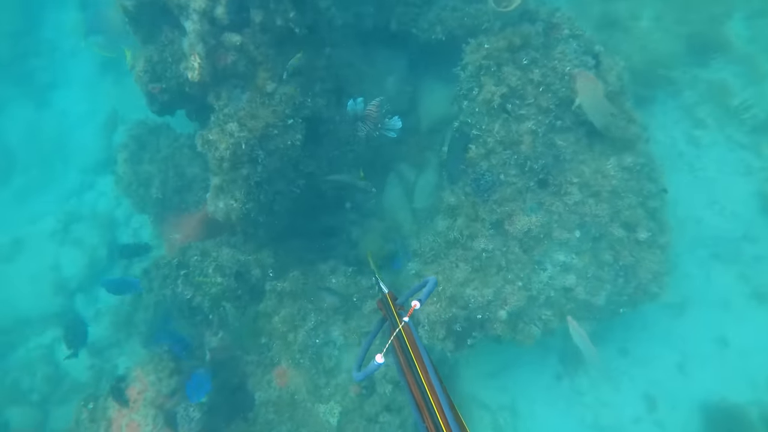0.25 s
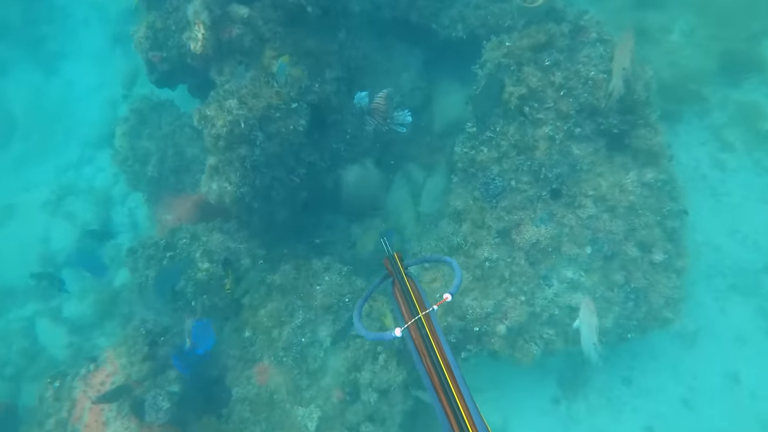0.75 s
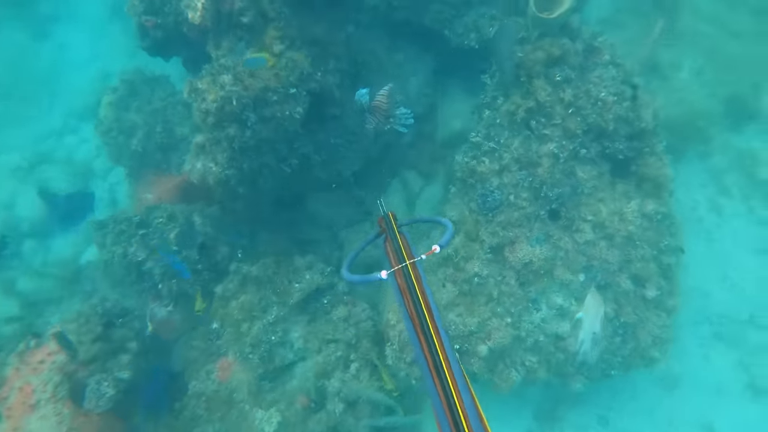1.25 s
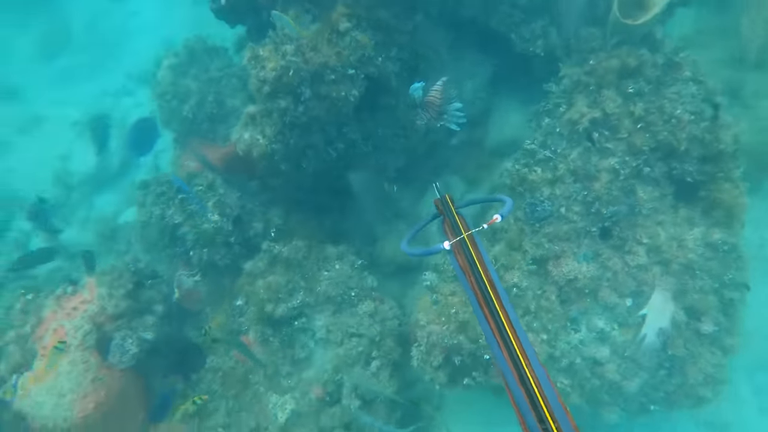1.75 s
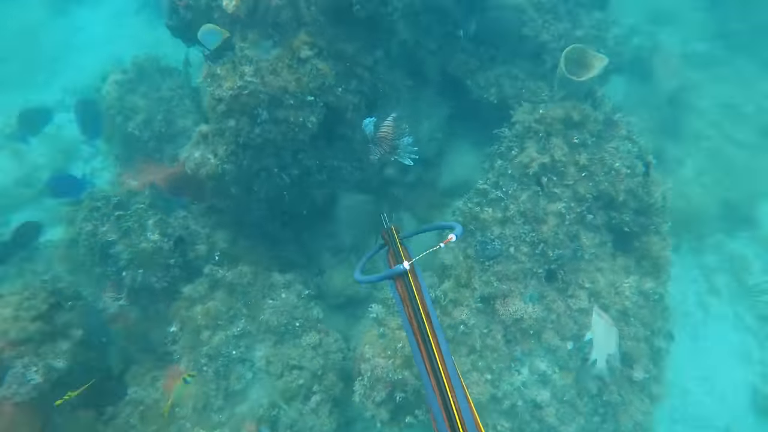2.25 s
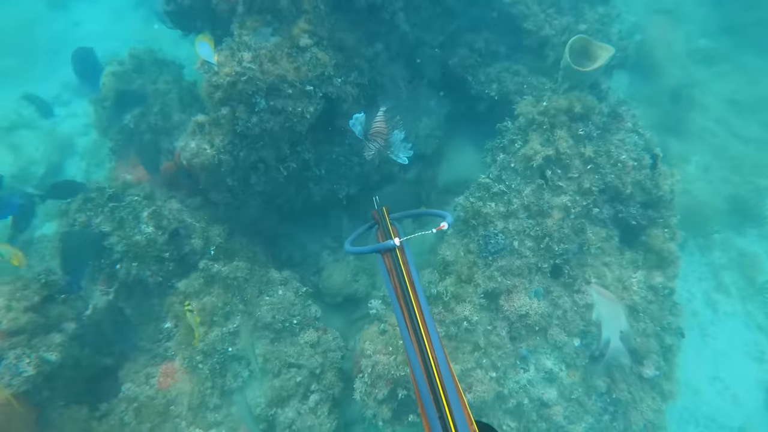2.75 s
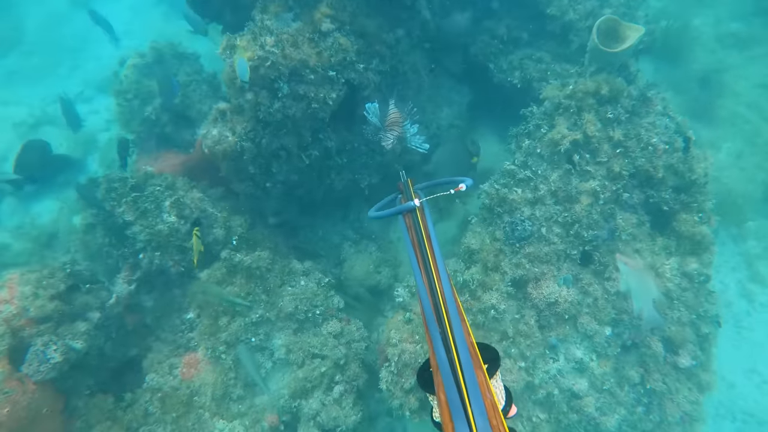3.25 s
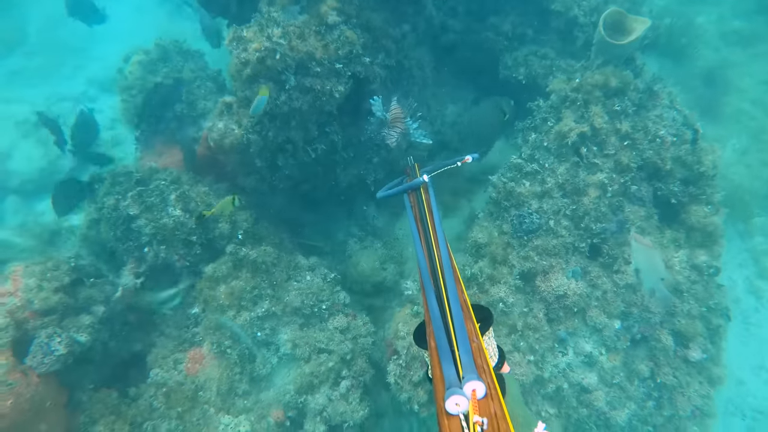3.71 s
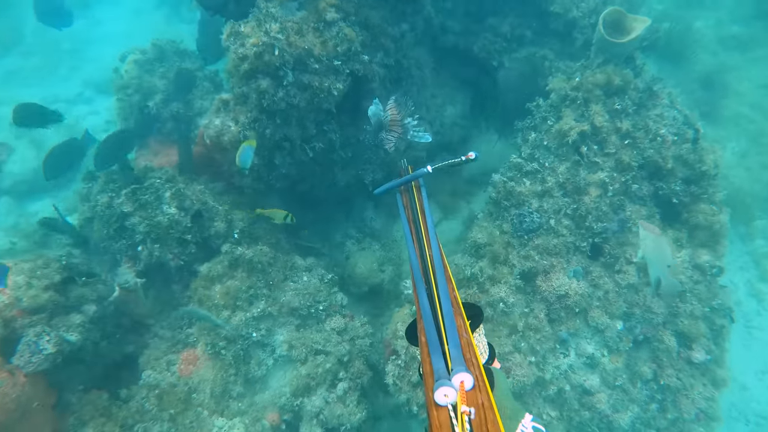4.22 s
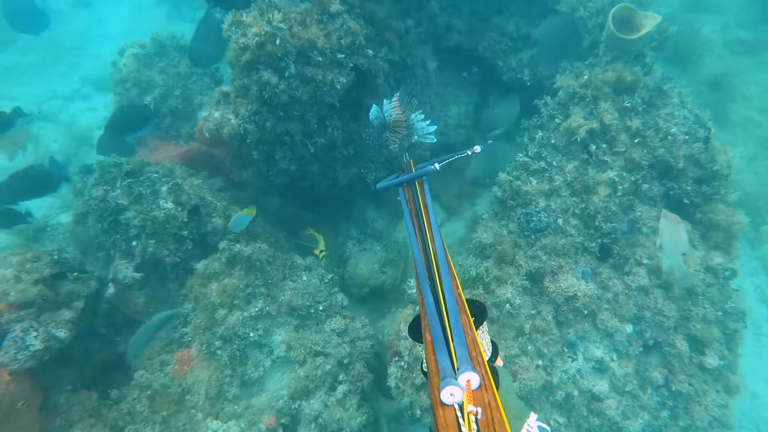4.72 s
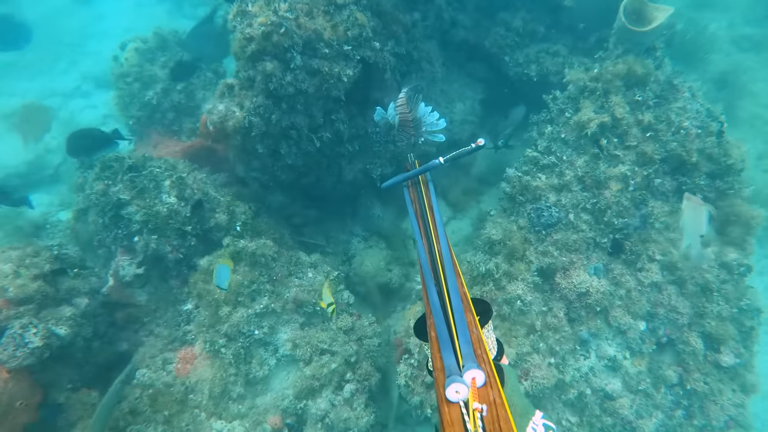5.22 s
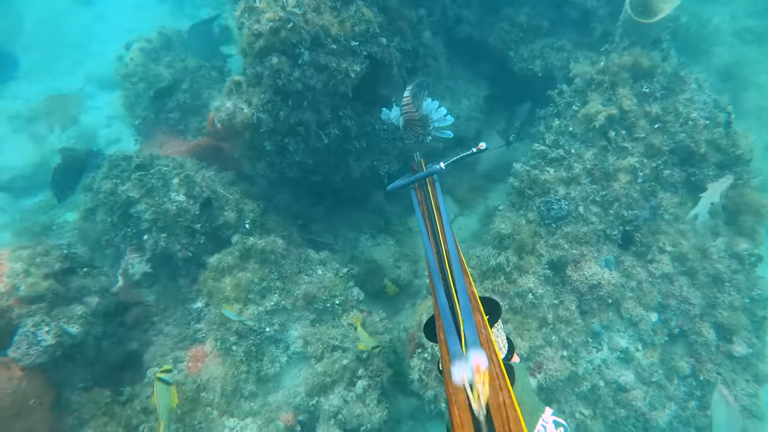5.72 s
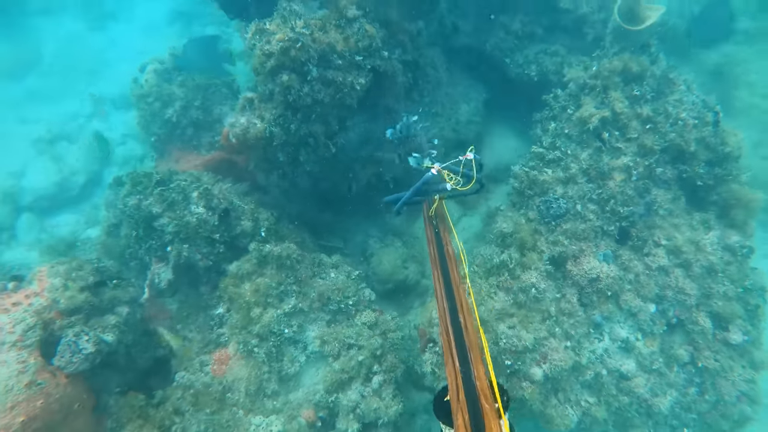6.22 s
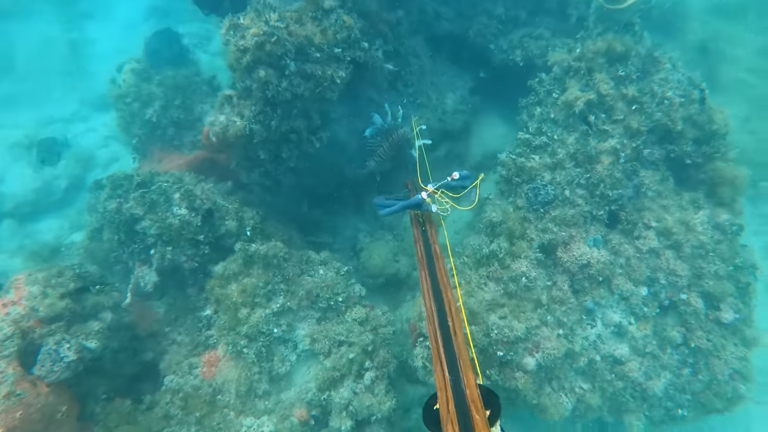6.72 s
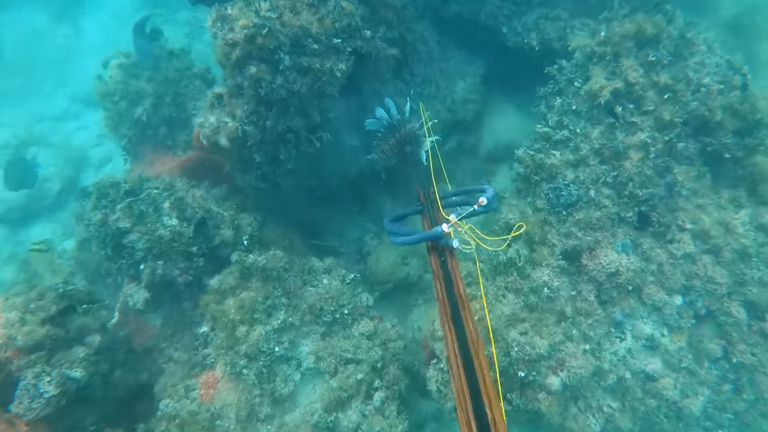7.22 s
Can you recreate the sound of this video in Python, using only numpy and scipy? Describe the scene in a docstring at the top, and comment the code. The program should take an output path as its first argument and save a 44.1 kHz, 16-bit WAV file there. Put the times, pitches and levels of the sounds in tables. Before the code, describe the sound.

Muffled underwater hum of a far boat, sharp shrimp snaps, then a heavy speargun shot with clattering line and a few closing bubbles.

```python
"""Under water on a reef, heard through a sealed camera housing. From the start a far boat motor hums, water
rumbles (filtered noise) and shrimp crackle and snap (noise bursts ringing the resonances of the housing).
A few thuds and faint bubbles (dying sines) pass; at 5.9 s a speargun is fired, water churns (swelling noise)
and its bands and line knock and rattle (more sines and bursts). Last, louder bubbles escape.
Gain control ducks on loud sound throughout."""
import sys
import numpy as np
from scipy import signal
from scipy.fft import rfft, irfft
from scipy.io import wavfile
from scipy.ndimage import uniform_filter1d

SR = 44100
rng = np.random.default_rng(int(sys.argv[2]) if len(sys.argv) > 2 else 0)


def master_out(mix):
    """Clip the mix to full scale and print it as 16-bit PCM to the path in sys.argv[1]."""
    frames = np.transpose(np.atleast_2d(mix))
    ceiling = np.clip(frames, -1, 1)
    pcm = np.round(ceiling * 32767).astype(np.int16)
    wavfile.write(sys.argv[1], SR, pcm)


N = 329427


def amp(db):
    """Decibels to gain."""
    return 10 ** (np.asarray(db) / 20)


def rms_one(x):
    """Scale to unit rms."""
    return x / np.sqrt(np.mean(x ** 2) + 1e-20)


def in_time(rows):
    """Columns of a curve table, interpolated to one value a sample."""
    time_s, *columns = np.transpose(rows)
    return [np.interp(np.arange(N) / SR, time_s, column) for column in columns]


def drift(rate_hz):
    """Slow random curve of spread 1: noise through two equal low-pass poles, run at SR / 40."""
    r = np.exp(-80 * np.pi * rate_hz / SR)
    noise = rng.standard_normal(N // 40 + 2002)
    slow = signal.lfilter([1], [1, -2 * r, r * r], noise)[2000:]   # drop the settling
    return np.interp(np.arange(N) / 40, np.arange(len(slow)), rms_one(slow))


def ring(x, hz, width_hz):
    """Two-pole resonance: a unit click starts a dying sine of nominal height 1."""
    r, w = np.exp(-np.pi * width_hz / SR), 2 * np.pi * hz / SR
    return signal.lfilter([0, np.sin(w)], [1, -2 * r * np.cos(w), r * r], x + 1e-18)


def steady(x, hz, width_hz):
    """Resonance applied twice for steep skirts, about gain 1 on its top."""
    wide_hz = 1.4 * width_hz
    top_gain = 4 * (1 - np.exp(-np.pi * wide_hz / SR)) ** 2
    return ring(ring(x, hz, wide_hz), hz, wide_hz) * top_gain


# housing resonances: (frequency [Hz], nominal width [Hz], level [dB])
HOUSING_MODES = [(354, 54.3, -1), (426, 55.6, 1), (474.8, 56, -7), (626.5, 100, -19), (756, 315, -34.5),
                 (1364.2, 105, -11), (1563.7, 88, -4), (1739, 89, -9), (1982, 210, -22.5), (2493, 344, -24),
                 (3004, 600, -26), (3516, 150, -29.5), (3843, 250, -20), (4488, 425, -24),
                 (4950, 267, -21.5), (5540, 107, -26), (6550, 720, -24), (7923, 680, -29), (8877, 385, -29),
                 (9370, 980, -38.5), (10290, 950, -40.5), (11700, 1700, -49), (13400, 1800, -50)]
# low, body, middle and top parts of the housing: (from [Hz], to [Hz])
HOUSING_PARTS = [(0, 1000), (1000, 2300), (2300, 5500), (5500, 20000)]


def housing(x, part, spread_db=None, damping=1):
    """Parallel modes of one part of the housing; a deep gap parts the low modes from the body modes."""
    low_hz, high_hz = HOUSING_PARTS[part]
    out, sign, reach_hz = 0, 1, 0
    for k, (hz, nominal_width_hz, mode_db) in enumerate(HOUSING_MODES):
        if low_hz < hz < high_hz:
            width_hz = nominal_width_hz * damping
            if hz - width_hz < reach_hz:   # overlapping neighbours swing against each other
                sign = -sign
            reach_hz = hz + width_hz
            gain_db = mode_db if spread_db is None else mode_db + spread_db(k)
            out = out + sign * amp(gain_db) * steady(x, hz, width_hz)
    if part:
        gap = signal.butter(3, 1100.0, "high", fs=SR, output="sos")
    else:
        gap = signal.butter(3, [290.0, 700.0 * damping ** .5], "band", fs=SR, output="sos")
    return signal.sosfilt(gap, out)


# motor, swelling as the boat rides the waves: (time [s], mean hum frequency [Hz], hum level before flutter [dB])
MOTOR_CURVE = [(0.0, 88.5, -38), (0.2, 92, -33), (0.55, 89.35, -41), (0.92, 87.8, -41), (1.25, 89.85, -39),
               (1.55, 92.7, -35.5), (1.85, 92.6, -38), (2.07, 88.6, -46), (2.45, 93, -32), (2.7, 89, -41.5),
               (3.1, 89, -40.5), (3.3, 90, -39), (3.56, 94, -35.5), (3.85, 90, -40.5), (4.0, 88.9, -42.5),
               (4.45, 90.5, -40), (4.7, 93, -36), (5.15, 89, -42), (5.33, 89.4, -46.5), (5.7, 91.8, -38.5),
               (6.6, 93.7, -42.5), (7.47, 84.4, -56.5)]
# thin whine from the motor's gearing: (time [s], level [dB])
WHINE_CURVE = [(0, -65), (1.5, -73.5), (2.6, -51), (4.0, -47), (4.6, -52), (7.47, -51.5)]
WHINE_HZ, WHINE_WIDTH_HZ = 1586, 40
WAVER_HZ, FLUTTER_DB, FLUTTER_RATE_HZ = 1.2, 2, 7.5
SCATTER_SHARE, SCATTER_RATE_HZ = .4, 6   # paths shifting off surface and bed


def motor():
    """One firing order wavers and is broken up by scattered paths; the whine is noise in a narrow resonance."""
    mean_hz, hum_db = in_time(MOTOR_CURVE)
    scatter = drift(SCATTER_RATE_HZ) + 1j * drift(SCATTER_RATE_HZ)
    paths = 1 + SCATTER_SHARE * scatter
    turns = np.cumsum(mean_hz + WAVER_HZ * drift(3.47)) / SR
    hum = rms_one(np.imag(paths * np.exp(2j * np.pi * turns)))
    whine = rms_one(steady(rng.standard_normal(N), WHINE_HZ, WHINE_WIDTH_HZ))
    hum_gain = amp(hum_db + FLUTTER_DB * drift(FLUTTER_RATE_HZ))
    return hum_gain * hum + amp(in_time(WHINE_CURVE)[0]) * whine


# rumble spectrum before the cut below 16 Hz: (frequency [Hz], relative level [dB per Hz])
RUMBLE_SPECTRUM = [(20, 3), (30, -2), (50, -6.5), (70, -8), (110, -12.5), (140, -13.5), (180, -26),
                   (215, -23), (265, -29.5), (500, -56.5), (900, -60.5), (2000, -99)]


def rumble(level_db):
    """Water shoving at the housing: lumpy low noise, shaped in the spectrum."""
    hz = np.maximum(np.arange(N // 2 + 1) * SR / N, 1)
    corner_hz, density_db = np.array(RUMBLE_SPECTRUM).T
    shape = amp(np.interp(np.log(hz), np.log(corner_hz), density_db))
    shape = shape * np.minimum(hz / 16, 1) ** 2
    noise = rms_one(irfft(rfft(rng.standard_normal(N)) * shape, N))
    return amp(level_db + 2.5 * drift(7.2)) * noise


BASE_CRACKLE_PER_S = 220   # before clumping
CRACKLE_DB, HISS_DB = -26.5, -27   # before the housing
FAR_CUT_HZ = 12100   # far sound loses its top


def crackle():
    """Far snaps at random, in clumps, each smeared by the coral into a dying burst of noise."""
    sizes = amp(6.6 * np.minimum(rng.exponential(1, N), 3.5))
    born = rng.random(N) < BASE_CRACKLE_PER_S * amp(4.0 * drift(6.0)) / SR
    smear = np.exp(-1 / (0.0018 * SR))
    level = signal.lfilter([1], [1, -smear], sizes * born)
    return rms_one(level * rng.standard_normal(N))


def reef(wash_db):
    """Wash rings the low modes; far shrimp, some broad and some of one colour, ring the others over a hiss."""
    wash = housing(rng.standard_normal(N), 0, lambda k: 1.07 * drift(13.5))
    out = amp(wash_db) * rms_one(wash)
    broad = crackle()
    for part in range(1, 4):
        hiss = amp(HISS_DB + 0.22 * drift(31.0)) * rng.standard_normal(N)
        shrimp = amp(CRACKLE_DB) * (broad + 0.47 * crackle())
        out += housing(hiss + shrimp, part)
    return signal.sosfilt(signal.butter(3, FAR_CUT_HZ, fs=SR, output="sos"), out)


BURST_RISE_S, CLICK_HEIGHT = 0.00017, 3.4   # a click, then noise that swells this fast
ECHO_DB, ECHO_DECAY_S = -18, 0.0065


def struck(events, damping):
    """Each blow is a dying noise burst with a faint echo tail; each housing part rings to its own peak."""
    out, t = np.zeros(N), np.arange(round(.06 * SR)) / SR
    noise = rng.standard_normal((len(events), len(t)))
    spread_db = rng.normal(0, 1.68, (len(events), len(HOUSING_MODES)))
    time_s, *peaks_db, decay_ms = np.transpose(events)[:, :, None]
    direct = np.exp(-t * 1000 / np.maximum(decay_ms, .05))
    echoes = amp(ECHO_DB) * np.exp(-t / ECHO_DECAY_S)
    bursts = noise * (1 - np.exp(-t / BURST_RISE_S)) * (direct + echoes)
    bursts[:, 0] = CLICK_HEIGHT
    sound = 0
    for part, peak_db in enumerate(peaks_db):
        rung = housing(bursts, part, lambda k: spread_db[:, [k]], damping)
        sound = sound + amp(peak_db) * rung / np.abs(rung).max(axis=1, keepdims=True)
    for start, blow in zip(np.round(time_s[:, 0] * SR).astype(int), sound):
        out[start:start + len(t)] += blow[:N - start]
    return out


# loudest shrimp snaps: (time [s], body peak [dB], middle peak [dB], top peak [dB])
SNAP_EVENTS = [(0.0256, -34, -59, -60), (0.080, -30.5, -56, -59), (0.183, -57, -34.5, -37),
               (0.4375, -13.5, -8, -20.5), (0.4533, -32, -53, -55), (0.505, -27.5, -40, -52),
               (0.5145, -16.5, -24, -28.5), (0.518, -15, -21, -35), (0.5268, -22, -51, -51),
               (0.5544, -48, -39, -34), (0.593, -35, -33, -34), (0.646, -54, -55, -36),
               (1.0522, -51, -37, -28), (1.0828, -32.5, -30.5, -36), (1.3863, -6.5, -11, -23.5),
               (1.541, -34, -33.5, -44), (1.7287, -52, -28, -29), (1.8552, -37, -33, -32),
               (1.9036, -36, -35, -47), (1.958, -32.5, -44, -52), (2.045, -13.5, -15, -19.5),
               (2.0509, -19.5, -23, -38), (2.264, -31.5, -29.5, -38), (2.44, -48, -51, -43),
               (2.5756, -33, -36, -57), (2.687, -37, -49, -43), (2.707, -50, -48, -38),
               (2.785, -26.5, -38, -35), (2.9406, -32, -37.5, -36), (3.167, -35, -37, -43),
               (3.177, -32.5, -22, -30), (3.3152, -31, -35, -42), (3.3948, -36, -27.5, -26.5),
               (3.4263, -43, -31, -42), (3.5001, -46, -26.5, -31), (3.5334, -38, -39, -33),
               (3.607, -40, -34, -35), (3.7488, -36, -31, -30.5), (3.9505, -34, -19.5, -37),
               (3.987, -32, -31.5, -25), (4.153, -21, -12, -17.5), (4.226, -40, -29.5, -25.5),
               (4.2499, -31, -29, -31.5), (4.7746, -31, -25, -38), (5.0114, -8.5, -18.5, -28),
               (5.0207, -17.5, -37, -38), (5.0353, -41, -35, -45), (5.052, -40, -37, -43),
               (5.0743, -41, -32.5, -43), (5.1112, -31.5, -40, -45), (5.1268, -39, -40, -37),
               (5.2324, -34.5, -44, -43), (5.2739, -31, -50, -51), (5.4363, -42, -28, -36),
               (5.5032, -32, -36, -38), (5.7809, -34.5, -31.5, -32), (6.7341, -32, -37, -38),
               (6.8642, -33, -48, -62), (7.3394, -41, -40, -49), (7.3734, -50, -39, -42)]
SNAP_DECAY_MS = 0.58


def snaps():
    """A claw's bubble collapses within a millisecond and hardly moves the low modes."""
    events = []
    for time_s, body_db, *upper_db in SNAP_EVENTS:
        low_db = body_db - 18
        events.append((time_s, low_db, body_db, *upper_db, SNAP_DECAY_MS))
    return struck(events, damping=1.54)


def tones(events, rise_s, glide):
    """Each push swells into one dying sine that settles on its pitch; also returns the pushes as clicks."""
    out, pushes = np.zeros(N), np.zeros(N)
    for time_s, db, hz, t60_s in events:
        start = round(time_s * SR)
        t = np.arange(min(SR // 2, N - start)) / SR
        turns = hz * (t + glide * (1 - np.exp(-t / 0.016)) * 0.0067)
        swell = (1 - np.exp(-t / rise_s)) ** 2
        decay = amp(db - 60 * t / max(t60_s, .01))
        out[start:start + len(t)] -= decay * swell * np.sin(2 * np.pi * turns)
        pushes[start + round(rise_s * SR)] = amp(db)
    return out, pushes


# bubbles: (time [s], level before swell and wobble [dB], settled frequency [Hz], t60 [s])
BUBBLE_EVENTS = [(.01, -50, 598, 0.3), (4.67, -49, 660, 0.14), (4.8, -42, 663, 0.11),
                 (7.17, -27, 403, 0.32), (7.205, -23, 515, 0.26), (7.206, -19, 334, 0.1)]


def bubbles():
    """Each bubble is a dying sine whose level wobbles as it rises."""
    wobble = amp(5.6 * drift(28.4))
    return wobble * tones(BUBBLE_EVENTS, rise_s=0.0023, glide=-0.011)[0]


# water churned up as the gun is bumped, kicks back and swings: (time of the top [s], level before drift [dB])
SURGE_EVENTS = [(4.369, -32.5), (5.905, -14.5), (6.2, -28)]
SURGE_RISE_DB_PER_S, SURGE_FALL_DB_PER_S = 498, 111


def surges():
    """Churned water: low noise that rises fast and dies away after each surge."""
    t = np.arange(N) / SR
    level = 0
    for top_s, db in SURGE_EVENTS:
        drop_db = np.where(t < top_s, SURGE_RISE_DB_PER_S * (top_s - t), SURGE_FALL_DB_PER_S * (t - top_s))
        level = level + amp(db - drop_db)
    band = signal.butter(3, [50.0, 260.0], "band", fs=SR, output="sos")
    churn = signal.sosfilt(band, rng.standard_normal(N))
    return level * amp(1.0 * drift(6.9)) * rms_one(churn)


# dull knocks through the gun stock: (time [s], level before swell [dB], settled frequency [Hz], t60 [s])
KNOCK_EVENTS = [(1.565, -18, 99, 0.055), (1.876, -7, 164, 0.045), (3.335, -19.5, 30.5, 0.32),
                (4.291, -3.5, 120.8, 0.082), (4.355, -10, 100, 0.16), (5.395, -27, 129, 0.28),
                (5.864, -4.5, 109, 0.086), (5.905, -0.5, 73.9, 0.63), (5.927, 10, 88.4, 0.1),
                (5.948, 1.5, 67, 0.2), (5.970, -2, 86, 0.12), (5.991, 2, 102.6, 0.15),
                (6.040, 0, 102.5, 0.14), (6.084, -0.5, 114, 0.11), (6.152, 6.5, 114, 0.1),
                (6.204, -8.5, 98.4, 0.23), (6.22, -4, 126.5, .08), (6.247, 0.5, 128, 0.091),
                (6.372, -4, 65, 0.051), (6.460, 1.5, 181, 0.035), (7.389, -6, 111.4, 0.053)]
KNOCK_WASH_DB = -15


def knocks():
    """The stock thuds as dying sines and also shakes the low housing modes."""
    thud, pushes = tones(KNOCK_EVENTS, rise_s=0.00274, glide=0.27)
    soft = signal.sosfilt(signal.butter(4, 400.0, fs=SR, output="sos"), pushes)
    shaken = 0
    for hz, width_hz, db in HOUSING_MODES:
        if hz < 1000:
            shaken = shaken + amp(db + KNOCK_WASH_DB) * ring(soft, hz, width_hz)
    return thud + shaken


# trigger, bands and line on the gun:
# (time [s], low peak [dB], body peak [dB], middle peak [dB], top peak [dB], decay constant [ms])
RATTLE_EVENTS = [(5.8524, -17.5, -28, -24, -38, 1.3), (5.8561, -5, -27, -22, -32, 0.52),
                 (5.8602, -7, -14, -19, -15, 1.4), (5.8635, -12, -6.5, 1.5, -12.5, 0.88),
                 (5.8764, -33, -26, -29, -36, 9.4), (5.8814, -36, -32, -29, -26, 5),
                 (5.8985, -25, -12, -16, -23, 3), (5.9044, -21, -12.5, -20.5, -24, 6.1),
                 (5.9184, -16, -6, -7, -17, 3.9), (5.9234, 0, -2, -23, -8.5, 2.7),
                 (5.9284, -20, -10, -15, -22, 6.4), (5.9374, -25, -15, -18, -23, 6.2),
                 (5.957, -33, -23, -32, -42, 6.8), (5.972, -35, -32, -35.5, -52, 4.8),
                 (5.9834, -26, -37, -37, -40, 1.1), (5.9948, -37, -25, -45, -57, 3.7),
                 (6.0302, -23, -17, -42, -54, 2.5), (6.045, -21, -31, -34, -46, 12),
                 (6.057, -38, -29, -33, -36, 1.1), (6.0731, -17.5, -16, -17.5, -26, 2.6),
                 (6.0864, -24, -27, -25, -33, 3.4), (6.100, -34, -25, -35, -41, 8.2),
                 (6.128, -39, -19, -26, -48, 6.1), (6.1379, -15.5, -5.5, -37, -26.5, 3.9),
                 (6.143, -6.5, -11, -23, -36, 9.3), (6.1594, -17, -25, -26, -41, 3.6),
                 (6.1988, -17, -24, -33.5, -40.5, 6.9), (6.2357, -25, -29.5, -29.5, -35, 1),
                 (6.2796, -25, -34, -27, -35, 2.5), (6.352, -46, -28, -52, -49, 4.5),
                 (6.3654, -17, -11.5, -23, -33.5, 4.2), (6.385, -22.5, -26.5, -34, -37.5, 16),
                 (6.4233, -20.5, -20.5, -38, -60, 3.3), (6.4921, -31.5, -48, -43, -64, 1)]


def rattles():
    """Trigger, bands and line strike the gun: bursts through strongly damped housing modes."""
    return struck(RATTLE_EVENTS, damping=2.33)


# water: (time [s], rumble level before drift [dB], wash level in the low housing modes [dB])
WATER_CURVE = [(0.0, -34.5, -38.5), (0.3, -33.5, -45.5), (0.9, -36.5, -45), (1.5, -32, -43),
               (1.95, -33, -43), (2.2, -36.5, -42), (3.1, -36.5, -40.5), (3.5, -39, -42.5),
               (4.07, -35, -42.5), (4.3, -40.5, -41), (4.7, -33.5, -41.5), (5.15, -38.5, -44),
               (5.5, -35, -42), (5.8, -39, -42), (6.1, -16.5, -32), (6.5, -28, -42.5), (7.05, -32, -39),
               (7.47, -29.5, -37)]


def scene():
    """All sources at the one microphone."""
    rumble_db, wash_db = in_time(WATER_CURVE)
    background = motor() + rumble(rumble_db) + reef(wash_db) + snaps() + bubbles()
    gun = surges() + knocks() + rattles()
    return (background + gun)[None]


# quick and slow gain control: (averaging [s], threshold [dB], cut per dB over [dB/dB], recovery [dB/s])
DUCKING_STAGES = [(.01, -13.5, 0.2154, 80), (0.098, -21, 0.67, 5)]
CUTOFF_HZ = 16300   # stopband edge


def record(dry):
    """Gain control ducks on loud sound in a quick and a slow stage; the top is dulled, peaks clip, top is cut."""
    t, cut_db = np.arange(N) / SR, 0
    for span_s, threshold_db, share, recovery_db_per_s in DUCKING_STAGES:
        power = uniform_filter1d(dry ** 2, round(span_s * SR))
        level_db = 10 * np.log10(np.maximum(power, 1e-12))
        over_db = share * np.maximum(level_db - threshold_db, 0)
        recovery_db = recovery_db_per_s * t
        cut_db = cut_db + np.maximum.accumulate(over_db + recovery_db, axis=1) - recovery_db
    r = np.exp(-1 / (0.06 * SR))   # the gain follows with a lag
    wet = dry * amp(-signal.lfilter([1 - r], [1, -r], cut_db))
    wet = signal.sosfilt(signal.butter(2, 13500.0, fs=SR, output="sos"), wet)   # the microphone dulls the top
    top_cut = signal.cheby2(12, 70, CUTOFF_HZ, fs=SR, output="sos")
    return signal.sosfilt(top_cut, np.clip(wet, -1, 1))


dry = scene()
out = record(dry)
master_out(out)
```